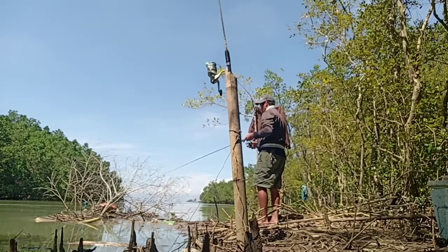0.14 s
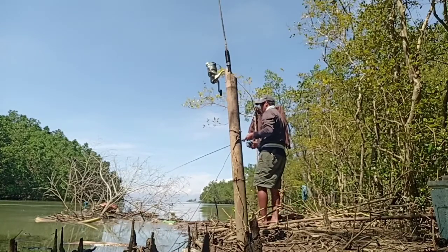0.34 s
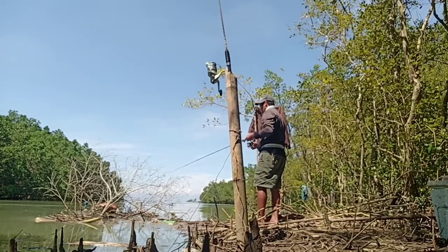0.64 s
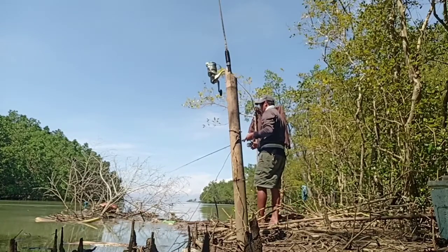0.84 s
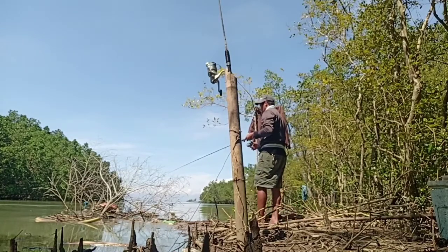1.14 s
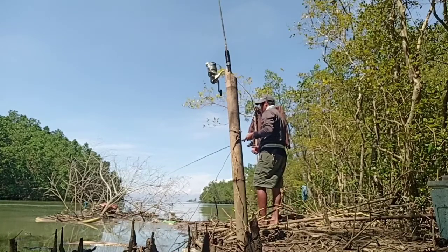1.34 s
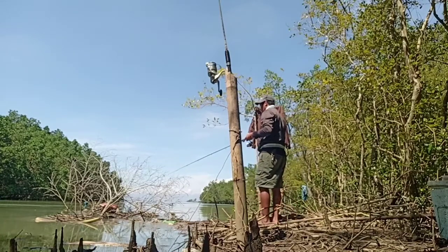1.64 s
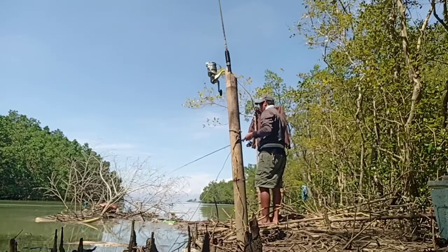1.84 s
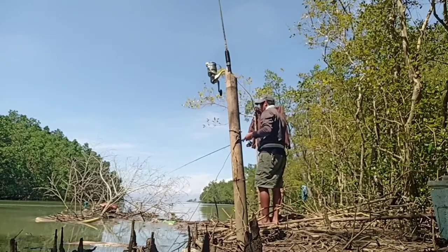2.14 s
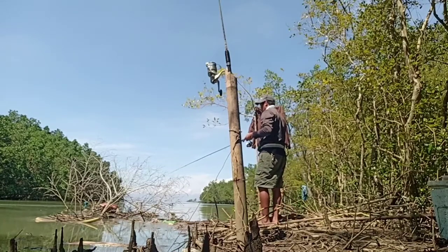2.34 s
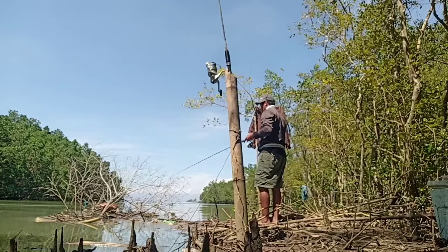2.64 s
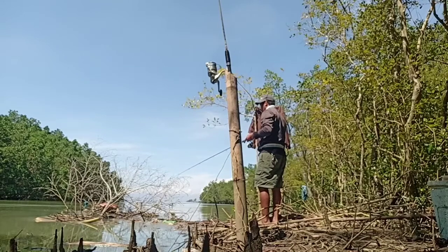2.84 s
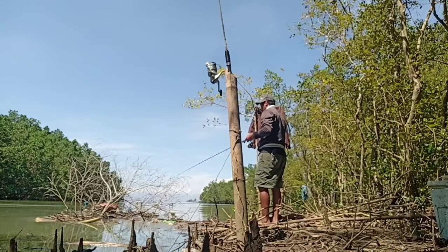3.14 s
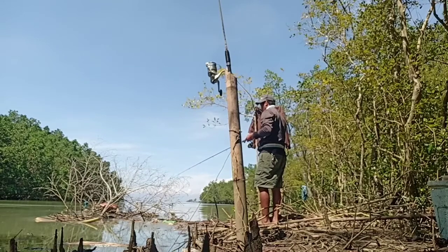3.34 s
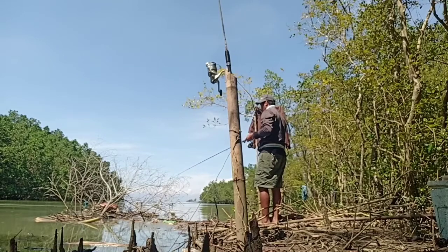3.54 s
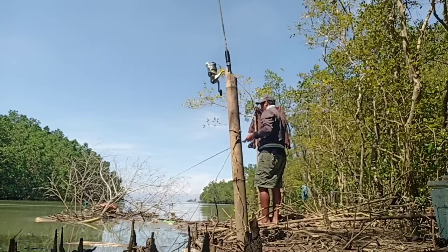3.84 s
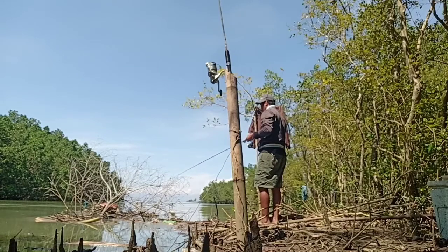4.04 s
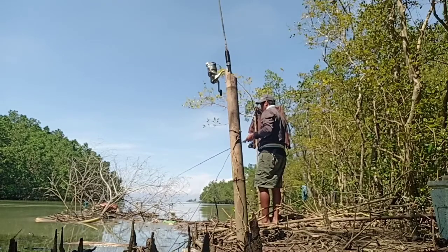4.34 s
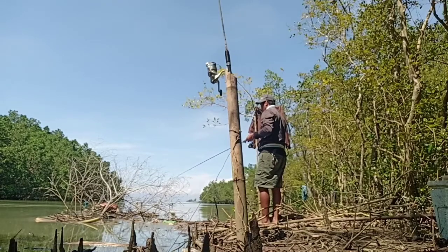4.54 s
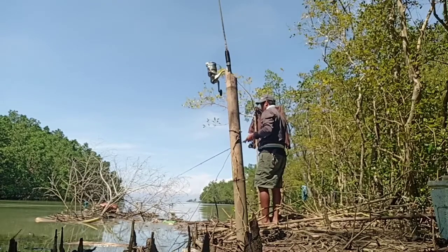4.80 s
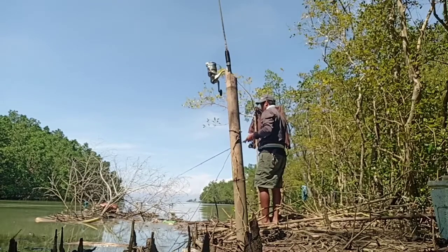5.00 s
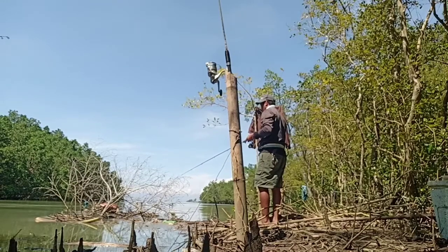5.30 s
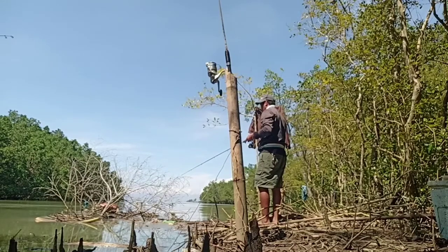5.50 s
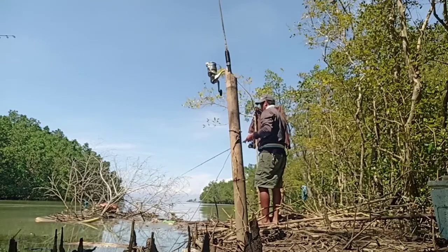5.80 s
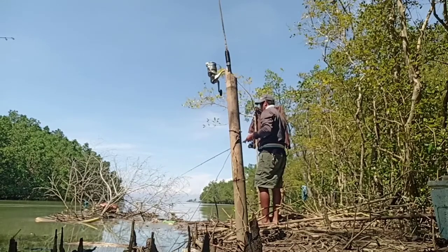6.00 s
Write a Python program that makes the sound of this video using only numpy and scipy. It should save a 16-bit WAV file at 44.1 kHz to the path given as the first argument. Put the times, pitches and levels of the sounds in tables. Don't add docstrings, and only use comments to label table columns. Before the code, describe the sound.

A dense, high cicada chorus shimmers steadily over the low throbbing rumble of distant boat engines, with faint rustles, ticks and bubbling pops by the water.

```python
import sys
import numpy as np
from scipy import signal
from scipy.fft import rfft, irfft
from scipy.io import wavfile
from scipy.ndimage import uniform_filter1d

SR = 44100
rng = np.random.default_rng(int(sys.argv[2]) if len(sys.argv) > 2 else 0)


def waveform_to_disk(signal):
    frames = np.transpose(np.atleast_2d(signal))
    scaled = np.clip(frames, -1, 1) * 32767
    samples = np.round(scaled).astype(np.int16)
    wavfile.write(sys.argv[1], SR, samples)


def elevation(decibels):
    levels = np.asarray(decibels, float)
    return 10 ** (levels / 20)


N = 271656
TIME_S = np.arange(N) / SR

# f/Hz, level/dB
FLOOR_SPECTRUM = [(20, -36.5), (45, -35.5), (60, -15.5), (95, -7.5), (140, -7), (200, -12), (300, -18),
                  (500, -23.5), (800, -29.5), (1100, -35.5), (1800, -40.5), (2600, -38), (4000, -37),
                  (4800, -57)]
# f/Hz, share/0-1
COMMON_SHARE = [(25, 0.9), (120, 0.93), (300, 0.83), (700, 0.33), (1300, 0.17), (2500, 0), (4000, 0.1)]
# t/s, peak/dB, f/Hz, width/Hz
TWIG_TICKS = [
    (4.286, -57.5, 14000, 2600),
    (5.1, -55, 1900, 3400),
    (4.944, -57, 3200, 2500),
    (5.455, -53.5, 2900, 2000),
    (6.062, -52, 3200, 3000),
    (4.044, -57, 1200, 1500),
    (3.8, -60, 1700, 1000),
    (3.4, -57, 2800, 2400),
    (2.9, -56, 3800, 1400),
]
# t of peak/s, peak/dB, fall/(dB/s), centre f/Hz
SWISHES = [(0.005, -57, 90, 3030), (.12, -58, 35, 3700), (.36, -61, 40, 3130), (.7, -66, 20, 3200),
           (1.065, -55, 44.5, 4030), (1.55, -61.5, 20, 3000), (1.8, -62.5, 58, 3200), (2.2, -77, 80, 3370),
           (2.65, -72, 60, 3350), (3.07, -70, 49, 3800), (3.18, -61.5, 42, 3600), (3.47, -63, 75, 3300),
           (3.69, -63, 40, 3350), (3.96, -60, 30, 3400), (4.2, -71, 31, 1300), (4.22, -58.5, 51, 2980),
           (4.43, -68, 26, 3600), (4.58, -67, 60, 3200), (4.65, -66, 149, 3800), (4.94, -80, 116, 3500),
           (5.34, -65, 30, 3600), (5.435, -59.5, 90, 3400), (6.06, -71.5, 140, 3100),
           (6.155, -70, 80, 3480)]
# t/s, peak/dB, f/Hz, t60/s, left minus right/dB
MUD_BUBBLES = [(.377, -63, 3000, 0.041, 0), (1.188, -57, 750, .064, 3), (1.208, -61, 1090, .058, 2),
               (1.275, -52.5, 930, 0.016, -10), (2.30, -61, 600, .03, -3), (4.033, -48, 1101, .0082, 0),
               (4.043, -52, 590, 0.023, -2), (4.052, -61, 650, .06, 0), (4.173, -48, 1170, 0.013, -2.5),
               (4.302, -58, 700, .03, 4), (4.387, -54, 1200, 0.014, -3), (4.432, -57, 865, 0.048, 2),
               (4.44, -63, 1950, .014, -4), (4.51, -53, 1210, 0.012, 3), (4.513, -55, 1620, .02, -1),
               (4.522, -42, 1190, 0.019, 0), (4.529, -50, 790, 0.067, 1), (4.645, -58.5, 3870, .015, 12),
               (5.787, -54, 1150, .03, 1), (5.80, -57, 1150, .02, 2)]
# t/s, length/s, f/Hz, level/dB
BIRD_PEEPS = [
    (5.802, .05, 4170, -62),
    (5.846, .056, 4170, -67),
    (5.9, .04, 4170, -73),
    (5.95, .02, 4170, -71),
    (5.86, .02, 3772, -73),
    (4.572, .05, 3300, -70),
    (4.44, .015, 3150, -68),
    (.11, .08, 3700, -69),
    (.39, .07, 2980, -75),
]
# multiple of firing rate, level/dB
FIRST_ORDERS = [(1, -29.5), (2, -28.5), (3, -7), (4, -3), (5, 0.5), (6, -2), (7, -2.5), (8, -12.5),
                (9, -11.5), (10, -16), (11, -19.5), (12, -19.5), (13, -24.5), (14, -16), (15, -20.5),
                (16, -22.5), (17, -24.5), (18, -36), (19, -35), (20, -21.5)]
SECOND_ORDERS = [(4, -16.5), (5, -12.5), (6, -1), (8, -3), (9, -14), (10, 0.5), (11, -13), (12, -5),
                 (13, -9), (14, -28), (16, -10), (19, -16), (20, -19.5), (30, -27.5), (32, -30.5)]
THIRD_ORDERS = [(3, -28), (7, -12), (8, -3.5), (11, -6.5), (12, -10), (13, -3.5), (14, -2), (16, -23),
                (17, -10), (18, -13), (19, -16), (20, -14.5), (22, -20.5)]
# t/s, level/dB
BOATS_LEVEL = [(0, -51.5), (1, -51.5), (1.6, -48.5), (2.4, -52), (2.8, -49), (3.5, -51), (4.4, -48),
               (5.2, -49.5), (5.6, -48.5), (6.16, -50.5)]
# t/s, level/dB
WHINE_LEVEL = [(0, -64.5), (1.2, -65), (1.7, -72), (2.3, -69), (2.65, -61), (4, -63.5), (6.16, -60)]
# t/s, level/dB, left minus right/dB
CHORUS_LEVEL = [(0, -43.5, 0.5), (1.5, -43, 0.1), (3, -43, .5), (4.5, -43, 1), (6.16, -43, 0)]
# f/Hz, level/(dB per Hz)
CHORUS_MAIN_BAND = [(3700, -40.5), (4400, -34), (5000, -23.5), (5600, -14.5), (6050, -8), (6140, 0.5), (6500, 1),
                    (6900, -7.5), (7620, -9.5), (7700, -15), (8480, -19), (8560, -33), (8920, -35.5),
                    (9000, -62.5)]
# f/Hz, level/(dB per Hz)
CHORUS_OCTAVE_BAND = [(11450, -57), (11600, 3.5), (13100, 1.5), (13800, -9), (15130, -14), (15190, -16.5),
                      (15460, -11.5), (15520, -52)]
# f/Hz, gain/dB
CAMERA_GAP = [(8950, 0), (9200, -70), (11350, -70), (11500, 0)]

PORT_LAG_SAMPLES = 18
COARSE = 32


def level(x, db):
    return x * elevation(db) / np.sqrt(np.mean(x ** 2))


def along_hz(table):
    hz, value = np.transpose(table)
    bins_hz = np.arange(N // 2 + 1) * SR / N
    return np.interp(np.log(bins_hz + 1), np.log(hz), value, left=value[0], right=value[-1])


def colour(x, table):
    return irfft(rfft(x) * elevation(along_hz(table)), N)


def curves(table):
    s, *columns = np.transpose(table)
    return [np.interp(TIME_S, s, c) for c in columns]


def walk(rate_hz):
    hold = int(SR / rate_hz)
    steps = np.repeat(rng.standard_normal(N // hold + 1), hold)
    return 1.23 * uniform_filter1d(uniform_filter1d(steps, hold), hold)[:N]


def pan(pan_db):
    return elevation(np.array([[pan_db], [-pan_db]]) / 2)


def ports(x, pan_db=0):
    return np.array([np.roll(x, PORT_LAG_SAMPLES), x]) * pan(pan_db)


def floor():
    share = np.clip(along_hz(COMMON_SHARE), 0, 1)
    common = rfft(ports(rng.standard_normal(N) * elevation(1.4 * walk(6.5))))
    own = rfft(rng.standard_normal((2, N)) * elevation(1.1 * walk(10)))
    mix = np.sqrt(share) * common + np.sqrt(1 - share) * own
    return level(irfft(mix * elevation(along_hz(FLOOR_SPECTRUM + [(9000, -120)])), N), -53)


def ticks():
    out, t = np.zeros((2, N)), np.arange(512) / SR
    for s, db, hz, width_hz in TWIG_TICKS:
        edges_hz = [hz - width_hz / 2, hz + width_hz / 2]
        sos = signal.butter(2, edges_hz, "band", fs=SR, output="sos")
        burst = level(signal.sosfilt(sos, rng.standard_normal((2, len(t)))), db)
        start = int(s * SR)
        out[:, start:start + len(t)] += burst * np.exp(-t / 0.0053)
    return out


def rustle():
    rise_db_s, slope_db = 498.5, 20.5
    stir_db, stir_hz = -81.5, 3400
    s, peak_db, fall_db_s, centre_hz = (c[:, None] for c in np.transpose(SWISHES))
    grid_s = TIME_S[::COARSE]
    late_s = grid_s - s
    swish_db = peak_db - np.where(late_s > 0, fall_db_s * late_s, -rise_db_s * late_s)
    grains = rng.standard_normal((2, N)) * (rng.random((2, N)) < .06)
    out = 0
    for hz in 1000 * 2 ** np.arange(0, 2.3, .2):
        sos = signal.butter(2, [hz / 1.09, hz * 1.09], "band", fs=SR, output="sos")
        band = level(signal.sosfilt(sos, grains), -0.5)
        swish_power = elevation(swish_db - slope_db * np.log2(hz / centre_hz) ** 2) ** 2
        stir_power = elevation(stir_db - slope_db * np.log2(hz / stir_hz) ** 2) ** 2
        power = swish_power.sum(axis=0) + stir_power
        out = out + band * elevation(walk(25)) * np.interp(TIME_S, grid_s, np.sqrt(power))
    return out


def bubbles():
    rise_per_s = 6
    out, t = np.zeros((2, N)), np.arange(4096) / SR
    for s, db, hz, t60_s, pan_db in MUD_BUBBLES:
        shape = (1 - np.exp(-t / 0.0005)) * np.exp(-np.log(1000) * t / t60_s)
        ring = shape * np.sin(2 * np.pi * hz * (t + rise_per_s * t ** 2 / 2))
        start = int(s * SR)
        out[:, start:start + len(t)] += ports(elevation(db + 10.0) * ring, pan_db)
    return out


def bird():
    out, t = np.zeros(N), np.arange(8192) / SR
    for s, length_s, hz, db in BIRD_PEEPS:
        shape = np.clip(np.minimum(t, length_s - t) / .006, 0, 1)
        start = int(s * SR)
        out[start:start + len(t)] += elevation(db) * shape * np.sin(2 * np.pi * hz * t)
    return ports(out, 4.4)


def engine(firing_hz, orders, unsteady, fading_db, smear):
    cycles = np.cumsum(firing_hz * (1 + unsteady * walk(3.994))) / SR
    phase = 2 * np.pi * (cycles + rng.random())[::COARSE]
    grid_s = np.arange(len(phase)) * COARSE / SR
    note = 0
    for k, db in orders:
        fade = np.interp(grid_s, np.linspace(0, N / SR, num=18), rng.standard_normal(size=18))
        note = note + elevation(db + fading_db * fade) * np.cos(k * phase - smear * k ** 2)
    return note, phase


def boats():
    all_db = curves(BOATS_LEVEL)[0][::COARSE]
    whine_db = curves(WHINE_LEVEL)[0][::COARSE]
    first, _ = engine(26.57, FIRST_ORDERS, unsteady=.0012, fading_db=2.2, smear=0.0994)
    second, second_phase = engine(15.39, SECOND_ORDERS, unsteady=.002, fading_db=3.14, smear=0.0696)
    third, _ = engine(10.4, THIRD_ORDERS, unsteady=0.0022, fading_db=1.6, smear=.012)
    chug = level(first + elevation(-1.5) * second + elevation(-2.5) * third, -1.5) * elevation(all_db)
    whine = 1.34 * elevation(whine_db) * np.cos(18 * second_phase)
    return ports(signal.resample_poly(chug + whine, COARSE, 1)[:N])


def cicadas():
    near_db, pan_db = curves(CHORUS_LEVEL)
    throb_hz = 9.5 + .5 * walk(1.54)
    throb_db = .7 * np.sin(2 * np.pi * np.cumsum(throb_hz) / SR) + .25 * walk(12)
    clicks = rng.standard_normal((2, N)) * (rng.random((2, N)) < .6) * elevation(throb_db)
    leaves = rng.standard_normal((2, 1024)) * np.exp(-np.arange(1024) / SR / 0.0045)
    leaves[:, 0] = 45
    clicks = signal.fftconvolve(clicks, leaves, axes=1)[:, :N]
    ring, octave = [], []
    for c in clicks:
        ring.append(level(colour(c * elevation(0.28 * walk(20)), CHORUS_MAIN_BAND), 0))
    for c in clicks:
        octave_db = .45 * throb_db + 0.92 * walk(10)
        octave.append(level(colour(c * elevation(octave_db), CHORUS_OCTAVE_BAND), -19.5))
    song = np.array(ring) + np.array(octave) * pan(-6)
    return song * elevation(near_db + 3 + np.array([pan_db, -pan_db]) / 2)


def scene():
    return floor() + ticks() + rustle() + bubbles() + bird() + boats() + cicadas()


def roll_off(x):
    return signal.sosfilt(signal.butter(12, 15400, fs=SR, output="sos"), x)


def record(dry):
    mix = colour(dry, CAMERA_GAP)
    return roll_off(mix)


dry = scene()
out = record(dry)
waveform_to_disk(out)
```